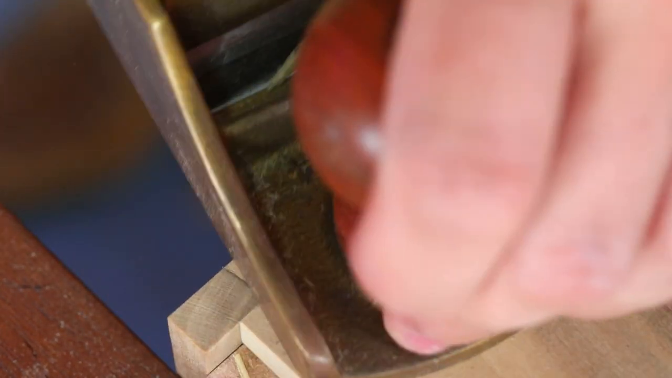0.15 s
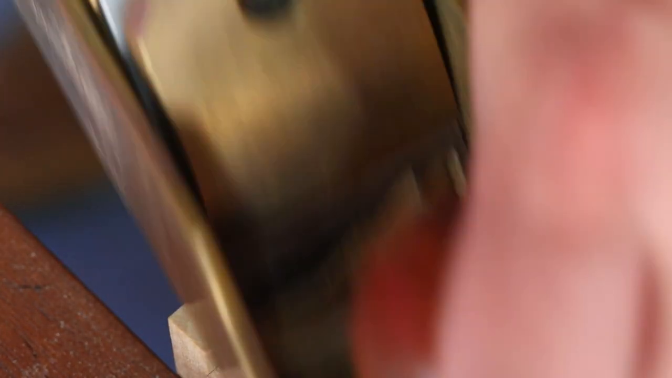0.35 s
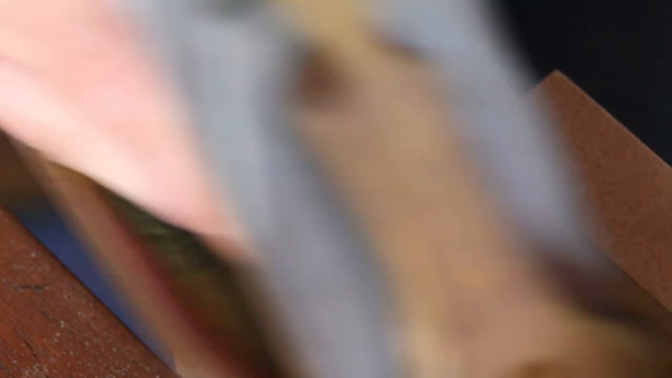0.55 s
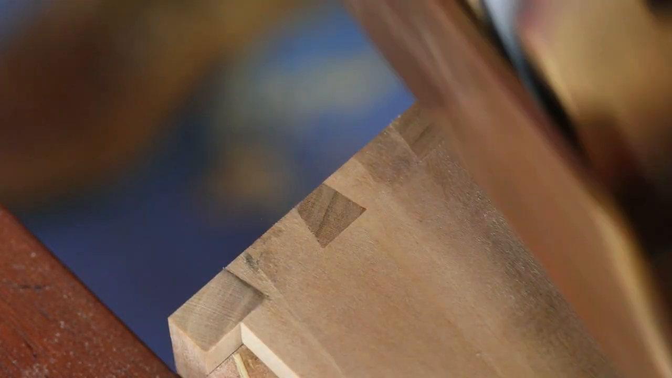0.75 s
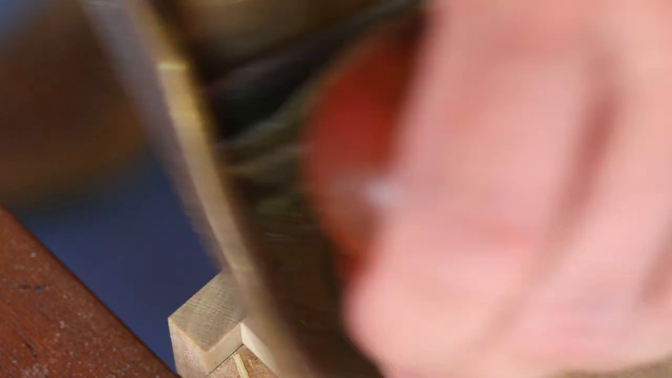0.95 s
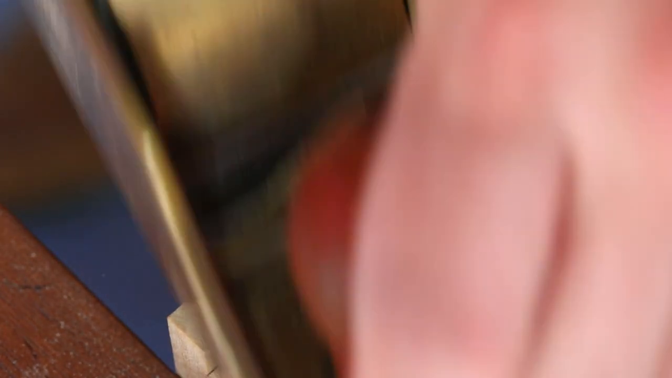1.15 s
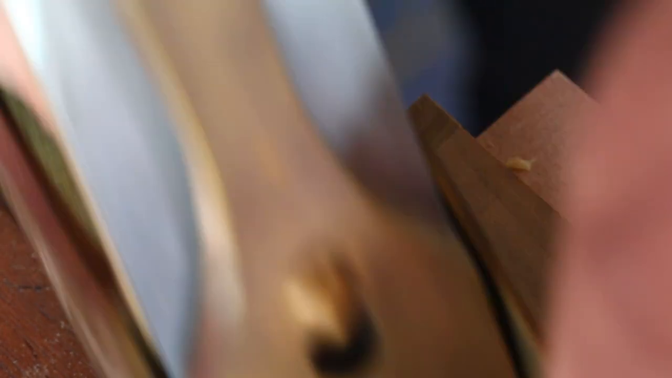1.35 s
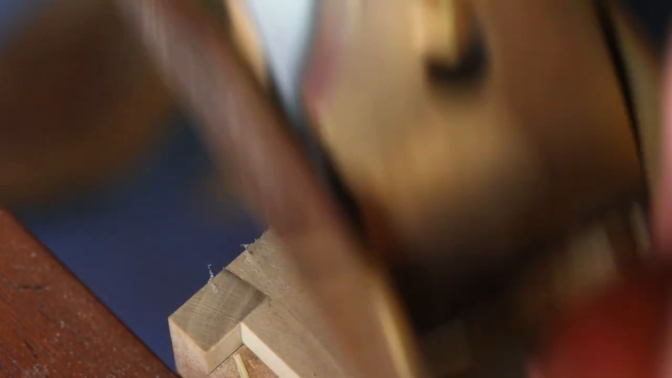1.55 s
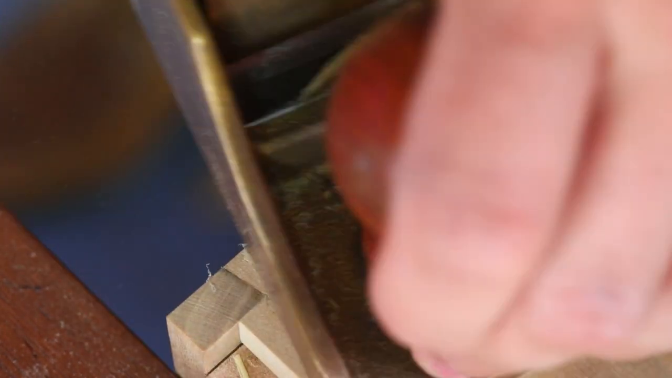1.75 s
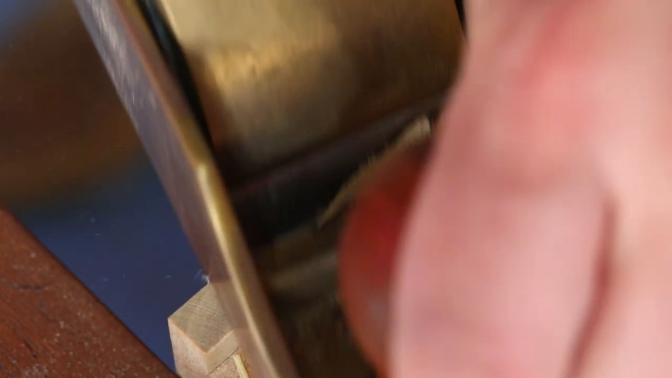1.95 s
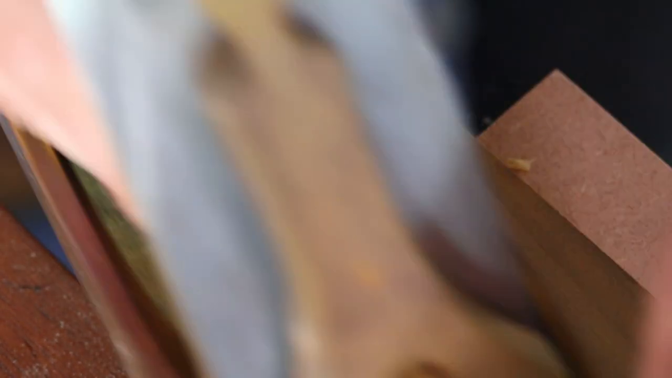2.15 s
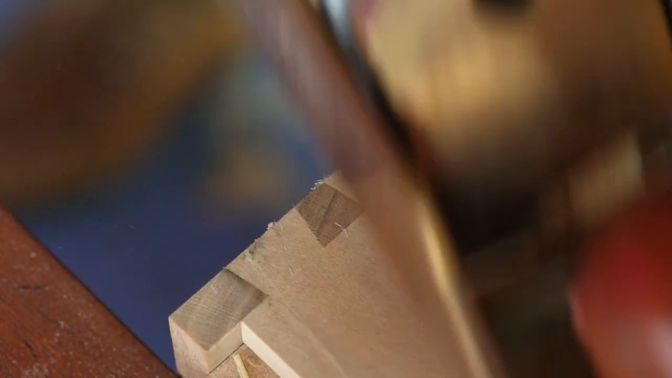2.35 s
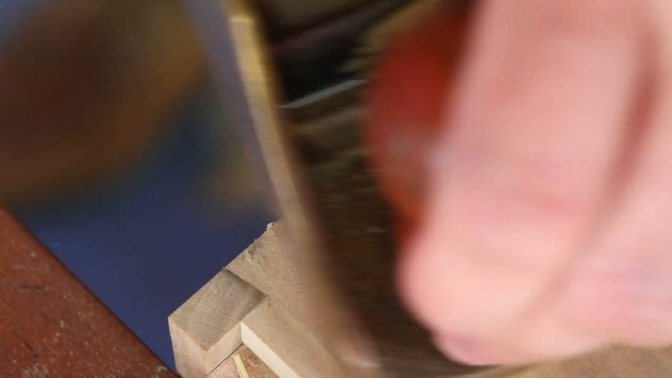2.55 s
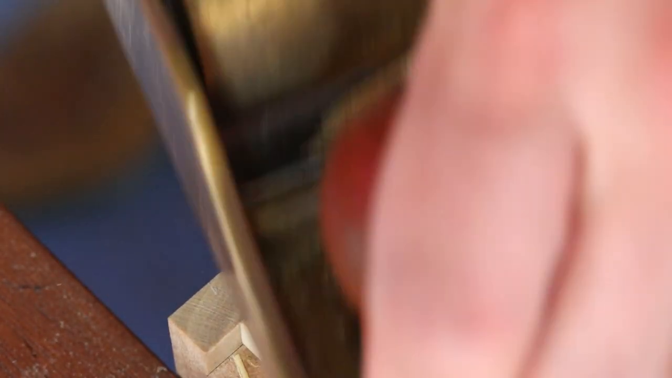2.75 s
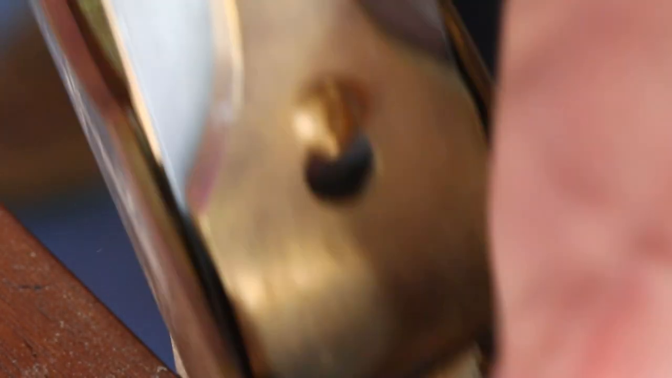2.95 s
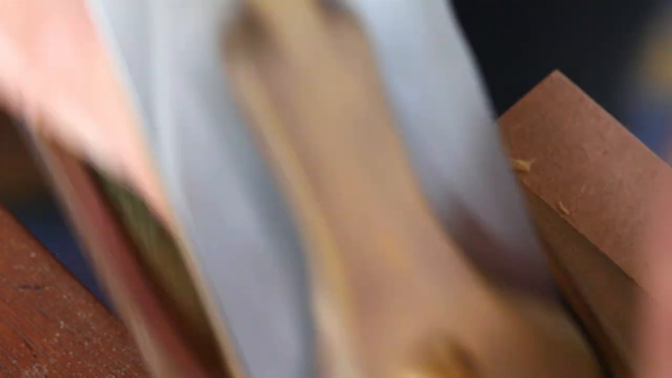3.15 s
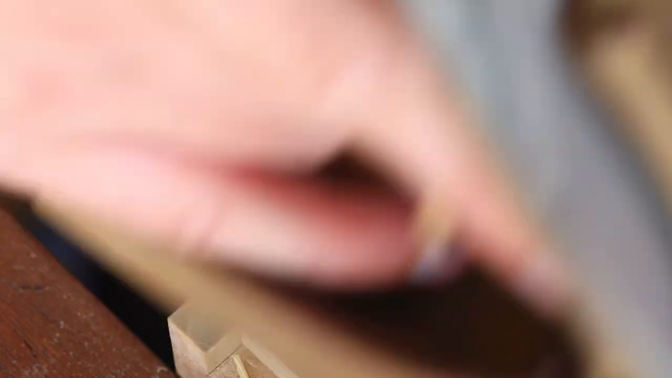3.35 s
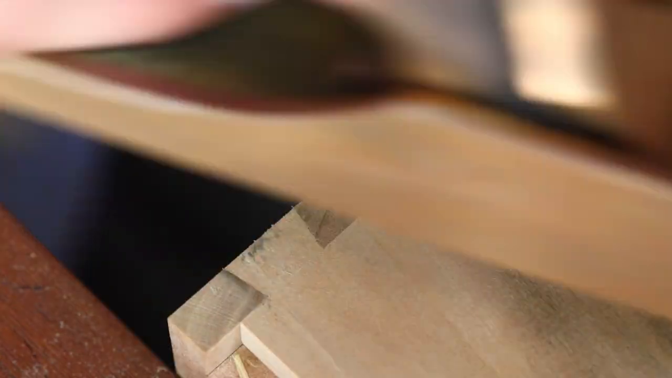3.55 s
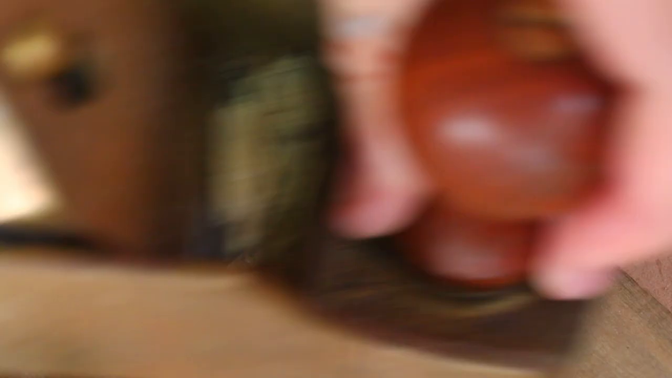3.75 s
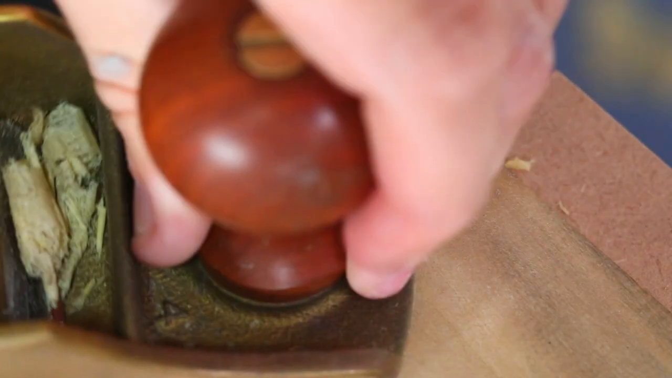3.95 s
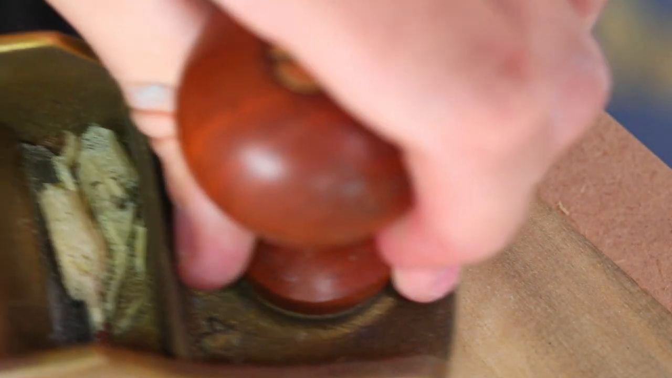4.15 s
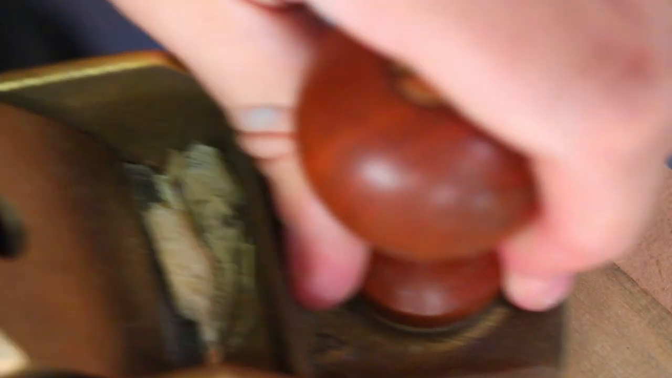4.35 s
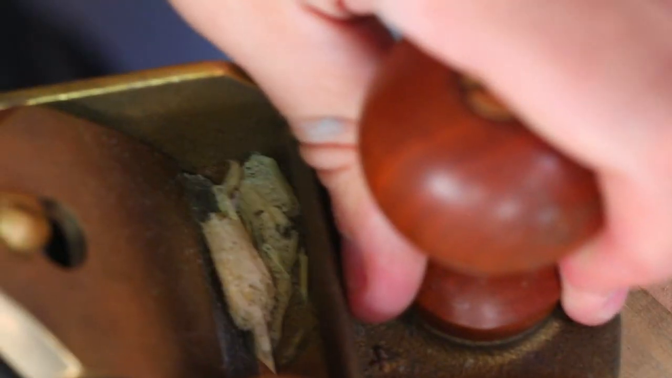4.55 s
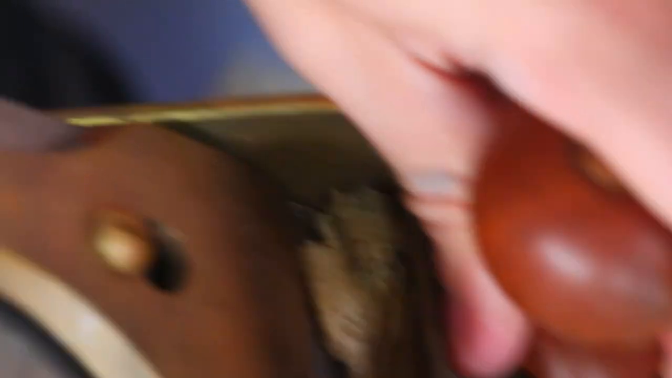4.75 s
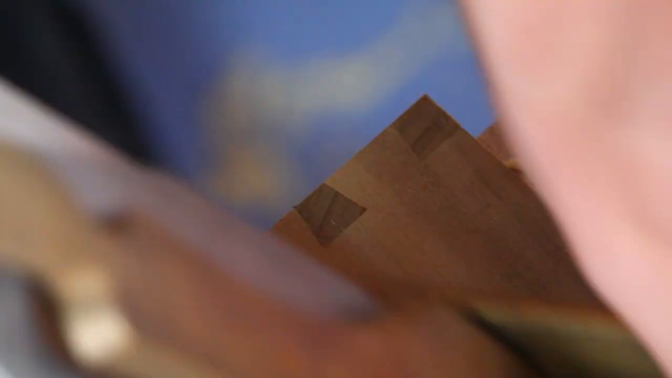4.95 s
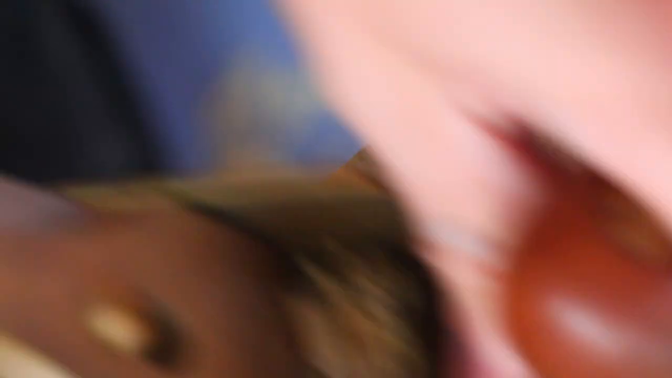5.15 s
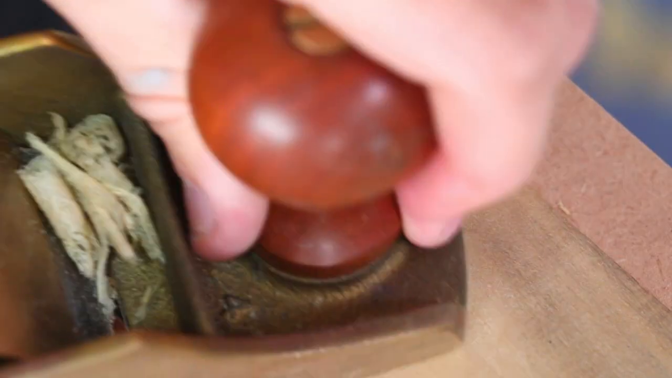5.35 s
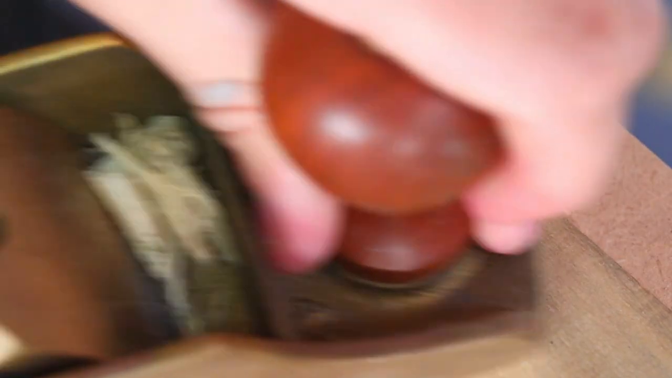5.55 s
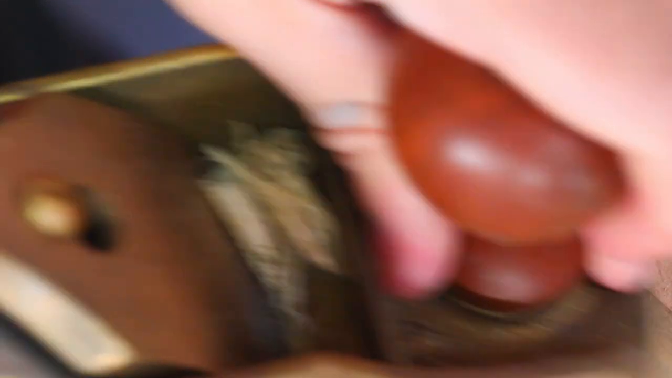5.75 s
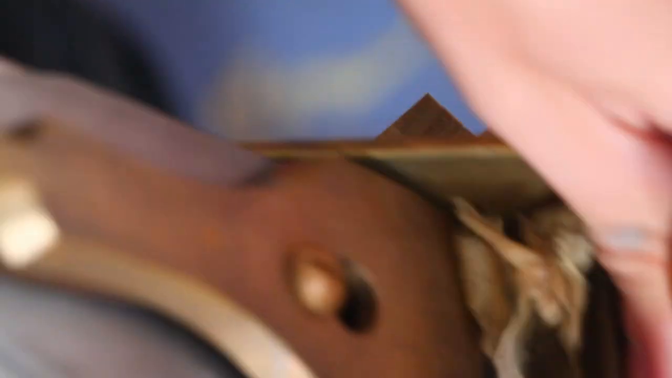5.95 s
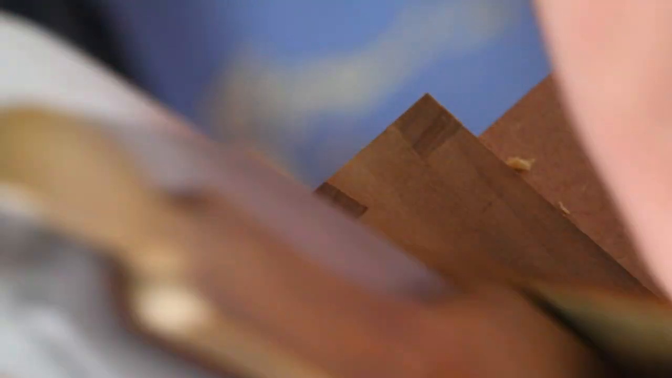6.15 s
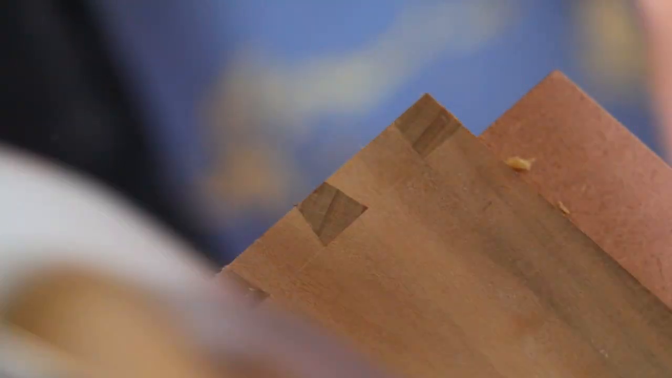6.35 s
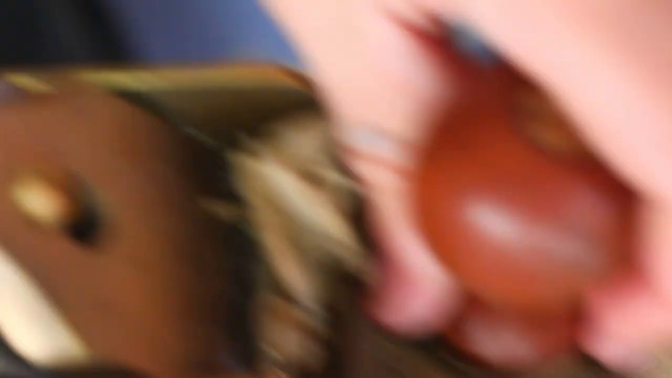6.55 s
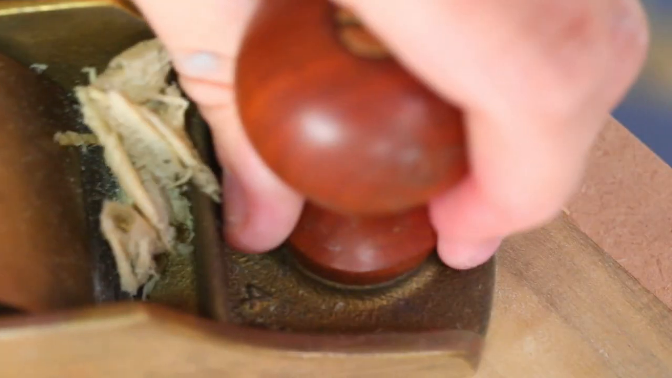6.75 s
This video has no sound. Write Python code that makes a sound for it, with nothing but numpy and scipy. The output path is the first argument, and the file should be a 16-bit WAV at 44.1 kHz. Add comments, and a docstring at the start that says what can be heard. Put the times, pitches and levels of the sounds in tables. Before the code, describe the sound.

Close to a workbench, a heavy metal plane lands on a wooden box with hard, hollow knocks, the second by far the loudest. Each knock leads to short gritty scrapes with a strong first bite, tearing fibres and thin hiss. After a softer, quieter pause the plane is repositioned, and smaller knocks and rougher, squeakier rasps follow. A small room answers briefly over very faint low air noise.

```python
"""Hand plane on end grain

Small workshop, one microphone close to the bench: a bronze plane trims the end grain of a dovetailed box.
Each landing of the sole is a knock: damped modes of box, plane and bench, a joint rattle and a dry click.
Each push is shaped noise: a rasp in the sole, tearing fibres and the iron's hiss; short tones squeak.
The bench trembles under the weight, the room answers knocks and scrapes, and low room noise lies behind.
"""
import sys
import numpy as np
from scipy import signal
from scipy.fft import rfft, irfft, next_fast_len
from scipy.io import wavfile
from scipy.ndimage import uniform_filter1d, map_coordinates

SR = 44100
rng = np.random.default_rng(int(sys.argv[2]) if len(sys.argv) > 2 else 0)


def wrap_up_sound(samples):
    """Save the sound to the file named by the first command line argument, as 16-bit audio."""
    columns = np.atleast_2d(samples).T
    # keep every value between -1 and 1, then stretch to whole-number steps
    tamed = np.clip(columns, -1, 1)
    steps = np.round(tamed * 32767).astype(np.int16)
    wavfile.write(sys.argv[1], SR, steps)


N = 304113  # length in samples

# The sole lands on the box, or the iron butts against its edge: t/s, level/dB (peak of box and plane),
# bench thud/dB and plane's ring/dB (both relative), upper edge f/Hz, damping by the hands (1 = normal)
LANDINGS = [(0.1991, -12, -0.5, -0.5, 2280, 1.3), (1.0674, -3.5, -7, 3.5, 3060, 0.94),
            (1.280, -40, 8.5, -4, 900, 1.0), (1.514, -53.5, -7.5, -7, 604, 1.0),
            (1.8194, -12.5, -0.5, 4.5, 2330, 1.5), (1.974, -39, 7, -9, 900, 0.57),
            (2.2840, -37.5, -3.5, -0.5, 1410, 0.74), (2.6141, -19.5, -4.5, 3.5, 2167, 1.83),
            (2.840, -31, -4.5, 6.5, 1300, 1.2), (3.238, -34.5, -5, -11.5, 2000, 1.26),
            (3.7660, -35.5, -1.5, -13.5, 990, 1.1), (3.9521, -20, -4.5, -7.5, 1690, 1.08),
            (5.3825, -17.5, -8, -0.5, 1880, 1.38), (5.4950, -39, 4.5, 0, 917, 0.78),
            (6.2450, -43, 12, -6, 901, 0.86), (6.7482, -23, -3, -13, 1180, 1.25)]
# Wooden box: f/Hz, level/dB, t60/s at damping 1
BOX_MODES = [(322.5, -17, .06), (439, -3, 0.082), (505.5, -2, 0.087), (571, -3.5, 0.064), (701, -7, .05),
             (812, -6, 0.046), (940, -9, 0.014)]
# Bronze body of the plane: f/Hz, level/dB, t60/s at damping 1
PLANE_MODES = [(1181.5, 3.5, .055), (1299.5, -4, 0.071), (1750, -11, 0.052), (1957, -3.5, 0.025),
               (2052, -2.5, 0.039), (2230, -4.5, 0.018), (2850, -26, 0.09), (3602, -25, 0.085),
               (4104, -21, 0.081), (5460, -13, 0.078)]
# Many weak modes between the strong ones: f/Hz, level/dB per Hz (relative)
WEAK_MODES = [(200, -10.5), (900, 2.5), (1550, 4), (2100, 0.5), (2600, -4.5), (3300, -8.5), (4200, -9),
              (5600, -7), (9000, -17.5)]
# Bench under the box, once the thud has settled: f/Hz, level/dB, t60/s at damping 1
BENCH_MODES = [(80, -42.5, 0.23), (109, -25.5, .25), (144.4, -17.5, .22), (175.8, -16.5, 0.22),
               (205.5, -19.5, 0.085), (240.4, -14.5, 0.16), (270.5, -18, 0.14), (445, -19, 0.17),
               (565, -27.5, 0.29)]
# Rattle of box and vice: f/Hz, level/dB per Hz (relative)
JOINT_RATTLE = [(60, -22.5), (130, 3), (220, 3.5), (330, -5.5), (500, -12.5), (900, -11), (1600, -17.5),
                (3000, -34), (9000, -54.5)]
KNOCK_ROOM_DB = 7  # the room's answer to a landing


def knocks(rattle_db=-10, rattle_t60=0.27, stiffening=.2, settle_s=.025, directions=4):
    """Each landing excites damped modes of box and plane, and longer ones in the bench."""
    track = np.zeros(N)
    t = np.arange(SR * 3 // 4) / SR
    # the blow presses the joints tight, so the thud starts high and sinks
    sinking = t + stiffening * settle_s * (1 - np.exp(-t / settle_s))
    for s, db, thud_db, plane_db, edge_hz, damping in LANDINGS:
        weak = amp(-4) * coloured(rng.standard_normal(len(t)), WEAK_MODES)
        weak = weak * amp(-60 * t * damping / .035)
        plane = ring(PLANE_MODES, t, damping, scatter_db=1.5) + weak
        body = ring(BOX_MODES, t, damping, scatter_db=2.4) + amp(plane_db) * plane
        body = softened(body, edge_hz)
        body = body / np.abs(body).max()

        rattle = coloured(rng.standard_normal(len(t)), JOINT_RATTLE)
        rattle = amp(rattle_db) * rattle * amp(-60 * t / rattle_t60)
        bench = ring(BENCH_MODES, sinking, damping=0.97, scatter_db=1.0)
        thud = amp(thud_db) * (bench + rattle) * (1 - np.exp(-t / 0.004))
        shove = amp(-29) * np.sin(2 * np.pi * 45 * t) * amp(-60 * t / 0.042)
        click = contact(t, edge_hz)

        # the click leaves differently in each direction, so its echo is smooth
        sprays = [workshop(contact(t[:SR // 2], edge_hz)) for _ in range(directions)]
        spray = sum(sprays) / np.sqrt(directions)
        echo = amp(KNOCK_ROOM_DB) * workshop(softened(body, edge_hz=3100) + amp(-13) * thud)

        add(track, s, amp(db) * (body + thud + shove + click + echo))
        add(track, s, amp(db + KNOCK_ROOM_DB + 2) * spray)
        # one edge of the sole touches just before the rest
        add(track, s - .0012, amp(db - 14) * click)
    return track


def ring(modes, t, damping, scatter_db):
    """Damped modes at new strengths for each blow; neighbours swing in opposite directions."""
    total = 0
    for k, (hz, db, t60) in enumerate(modes):
        strength_db = db + scatter_db * rng.standard_normal()
        decay = amp(strength_db - 60 * t * damping / t60)
        total = total + (-1) ** k * decay * np.sin(2 * np.pi * hz * t)
    return total


# Colour of the contact click: f/Hz, level/dB per Hz (relative)
CLICK_COLOUR = [(100, -8), (1000, 2.5), (2000, 1), (2600, 3), (3200, -2.5), (4100, -3.5), (5600, -6),
                (8000, -7.5), (15000, -5)]
CLICK_DB = -16  # relative to the knock, before decay and softening


def contact(t, edge_hz):
    """The short dry click of bronze on wood: noise decaying within milliseconds."""
    burst = coloured(rng.standard_normal(len(t)), CLICK_COLOUR) * amp(-60 * t / .024)
    return amp(CLICK_DB) * softened(burst, 2.8 * edge_hz)


def softened(x, edge_hz):
    """A longer contact passes less treble: a second-order low-pass."""
    low_pass = signal.butter(2, min(edge_hz, SR / 3), fs=SR, output="sos")
    return signal.sosfilt(low_pass, x)


# The sole skims with no weight on it: t/s, level/dB (hiss at mid-skim, before the mix), length/s
SKIM_PASSES = [(1.595, -72.5, 0.12), (2.607, -65.5, 0.124), (3.72, -70, .12), (4.272, -71.5, .24),
               (5.37, -65, 0.086), (6.29, -67.5, 0.38)]
# Rubbed resonances of sole and wood, one list per side of the box, before the glide:
# f/Hz, width/Hz, level/dB (relative)
SOLE_MODES = [
    [(624, 58, -11), (790, 130, -10.5), (1290, 165, -2.5), (1495, 120, -8), (1750, 200, -10.5)],
    [(783.3, 120, -5.5), (1010, 170, -10.5), (1150, 88, -2), (1277, 104, 0), (1800, 130, -14.5),
     (2085, 41, -20)],
]
# Resonances of the iron, one list per side: f/Hz, width/Hz, level/dB (relative)
IRON_MODES = [
    [(4200, 440, -11), (7430, 150, -5.5), (8410, 160, -6.5), (11180, 430, -0.5), (14300, 200, -11.5)],
    [(3600, 400, -8.5), (7583, 91, -9), (10940, 530, -3.5), (12750, 550, -7.5), (14170, 200, -11.5)],
]
# Torn end grain: f/Hz, level/dB per Hz (relative)
FIBRE_COLOUR = [(150, -12.5), (400, -3), (1500, -1.5), (2250, -3), (2800, -1.5), (3600, -3.5), (4200, -1.5),
                (5000, -6.5), (5900, -7), (6700, -12), (15000, -31.5)]
# Fine snaps at the cutting edge: f/Hz, level/dB per Hz (relative)
HISS_COLOUR = [(2000, -34), (5500, -12.5), (7000, -6), (9500, 0.5), (11500, 0.5), (13500, 1), (15800, -2.5)]


def strokes(droop=.03):
    """Friction rasps in the sole, end grain tears, and the thin iron hisses at its own resonances."""
    rasp, tear, edge = efforts()
    for s, db, length in SKIM_PASSES:
        swell = np.sqrt(np.abs(np.hanning(int(length * SR))))
        add(edge, s, amp(db) * swell)
    # the rasp sinks a little as the contact moves along the sole
    sole = rubbed(scrape(grain_db=2.0, grain_rate=250), SOLE_MODES)
    sole = glide(sole, 1 - droop * travel())
    fibres = coloured(scrape(grain_db=1.0, grain_rate=400), FIBRE_COLOUR)
    fibres = patchy(fibres, depth_db=2.0)
    snaps = coloured(scrape(grain_db=2.0, grain_rate=1500), HISS_COLOUR)
    iron = rubbed(scrape(grain_db=2.0, grain_rate=540), IRON_MODES)
    hiss = patchy(snaps + amp(-3) * iron, depth_db=2.1)
    return amp(-1.5) * rasp * sole + amp(1.5) * tear * fibres + edge * hiss


# The plane is pushed: t/s, length/s, attack/s, level/dB (hiss, before the mix), change by the end/dB,
# first bite/dB, sole's rasp/dB and torn fibres/dB (both relative to the hiss)
PUSH_STROKES = [(0.375, 0.19, .012, -49.5, -3, 7.5, 4, -4.5), (1.255, .15, .024, -46.5, -4, 5.5, 1, -4.5),
                (1.951, 0.053, .010, -45.5, -0.5, -0.5, 7, -11.5),
                (2.036, 0.17, .05, -46.5, -6.5, -4, 0, -5.5), (2.831, .12, .012, -49, -2, 3.5, 2.5, -7.5),
                (2.985, 0.22, .035, -53, -9.5, -2, -0.5, -1), (3.223, 0.069, .04, -54.5, -3, 2, 2.5, 0),
                (4.48, 0.04, .035, -56, 0, 1.5, 6.5, -7), (4.603, .19, .045, -60, -1, -2, 10.5, -5.5),
                (4.779, .205, .04, -53.5, 2, -1, 5, -6), (5.677, 0.044, .035, -45.5, 0, 0, 3.5, -11.5),
                (5.791, 0.096, .035, -53.5, -2.5, 1, 5.5, -6.5), (5.888, 0.4, .012, -51, -8, 5, 9.5, -3.5)]
# The sole is dragged back over the wood: t/s, length/s, rasp level/dB, fibres level/dB (before the mix)
DRAG_BACK = (5, 0.3, -63.5, -70.5)
BITE_S = 0.064  # the iron digs in hardest as it enters the wood
BITE_IN_RASP, BITE_IN_TEAR = 0.88, .3  # shares of that bite heard in sole and fibres
RASP_FOLLOWS = 0.71  # the sole's rasp changes less along a push than the cut does
TEAR_GROWS_DB = 5  # fibres break out more toward the far edge
RASP_RELEASE_S, TEAR_RELEASE_S, EDGE_RELEASE_S = 0.04, 0.034, .024  # time constants as a push ends
APPROACH_DB, APPROACH_S = -15.5, 0.042  # the sole slides up to the edge: hiss on both sides of the start
UNSTEADY_DB, UNSTEADY_RATE = 1.13, 22  # the grain resists unevenly: dB, random knots a second


def efforts():
    """Gains of rasp, tearing and hiss: each push slides in, bites, drifts in force and lets go."""
    s, length, rasp_db, tear_db = DRAG_BACK
    drag = gate(s, length, attack=0.05, release=.08)
    rasp, tear, edge = amp(rasp_db) * drag, amp(tear_db) * drag, np.zeros(N)
    for s, length, attack, db, change_db, bite_db, rasp_db, tear_db in PUSH_STROKES:
        t = np.arange(N) / SR - s
        progress = np.clip(t / length, 0, 1)
        bite = bite_db * np.exp(-(t / BITE_S) ** 2)
        drift = change_db * progress
        approach = amp(APPROACH_DB) * np.exp(-np.abs(t) / APPROACH_S)
        rasp_gain = amp(db + rasp_db + RASP_FOLLOWS * drift + BITE_IN_RASP * bite)
        tear_gain = amp(db + tear_db + drift + TEAR_GROWS_DB * progress + BITE_IN_TEAR * bite)
        rasp += rasp_gain * gate(s, length, attack, RASP_RELEASE_S)
        tear += tear_gain * gate(s, length, attack, TEAR_RELEASE_S)
        edge += amp(db) * (approach + amp(drift + bite) * gate(s, length, attack, EDGE_RELEASE_S))
    return np.array([rasp, tear, edge]) * amp(UNSTEADY_DB * wobble(UNSTEADY_RATE))


RETURN_S = .25  # time constant of the position, forward and back


def travel():
    """Where the plane is: it moves from -1 toward 1 while pushed and is drawn back in the pauses."""
    pushing = sum(gate(s, length, attack, EDGE_RELEASE_S) for s, length, attack, *_ in PUSH_STROKES)
    step = 1 / (RETURN_S * SR)
    return 2 * signal.lfilter([step], [1, step - 1], pushing) - 1


def scrape(grain_db, grain_rate):
    """Countless tiny fibre snaps in clumps: noise whose level wanders quickly and slowly."""
    level_db = grain_db * wobble(grain_rate) + 1.5 * wobble(45)
    return unit(rng.standard_normal(N) * amp(level_db))


TURN_S = 3.6  # the plane is turned to the next side of the box; the glide brings the sole's turn sooner


def rubbed(x, sides):
    """Friction noise through the resonances of whichever side is being planed."""
    first, second = (unit(resonant(x, modes)) for modes in sides)
    return np.where(np.arange(N) / SR < TURN_S, first, second)


def glide(x, pitch):
    """x read at a changing speed, which shifts its resonances."""
    return map_coordinates(x, [np.cumsum(pitch)], mode="mirror")


def patchy(x, depth_db=2.0):
    """The colour of the scrape wanders at random as the iron crosses the growth rings."""
    z = signal.stft(x, nperseg=512)[2]
    field = uniform_filter1d(rng.standard_normal(z.shape), size=7, axis=0)  # smooth over frequency
    field = uniform_filter1d(field, size=9, axis=1)  # smooth over time
    return unit(signal.istft(z * amp(depth_db * unit(field)), nperseg=512)[1][:N])


# The sole judders or squeaks as it settles, catches or slides off:
# t/s, level/dB (nominal, direct sound), length/s before release, mean slip rate f/Hz
SQUEAKS = [(0.2076, -20, 0.0043, 1204), (0.422, -37.5, 0.0089, 1312), (1.072, -15.5, 0.0067, 1198),
           (1.273, -26.5, 0.0071, 1278), (1.516, -53, 0.016, 439), (1.828, -29, 0.0039, 1193),
           (2.196, -43.5, 0.013, 1240), (2.84, -37, 0.022, 1294), (2.841, -40, 0.015, 768),
           (3.264, -45.5, 0.016, 2700), (4.921, -43.5, 0.012, 1260), (5.894, -32.5, 0.032, 1290),
           (5.962, -39.5, 0.021, 1264)]


def judders(jitter=0.076):
    """A run of sticks and slips, heard as a short tone of unsteady pitch."""
    track = np.zeros(N)
    t = np.arange(SR // 8) / SR
    for s, db, length, slip_hz in SQUEAKS:
        drift = unit(uniform_filter1d(rng.standard_normal(len(t)), size=60))
        swell = (1 - np.exp(-t / 0.0041)) * np.exp(-np.maximum(t - length, 0) / 0.0044)
        cycles = np.cumsum(slip_hz * (1 + jitter * drift)) / SR
        add(track, s, amp(db) * np.sqrt(2) * swell * np.sin(2 * np.pi * cycles))
    return track


# Weight bears on the bench: t/s, length/s, frame's drone level/dB, top's rumble level/dB
BENCH_LEANS = [(4.487, 0.48, -65, -56), (5.0, 0.3, -65, -67), (5.35, .93, -56.5, -60),
               (6.297, 0.66, -64.5, -69.5)]
# Sway of the bench frame: f/Hz, width/Hz, level/dB (relative)
FRAME_MODES = [(78, 7.5, -2), (108, 13, -10.5)]
# Rumble of the bench top: f/Hz, level/dB per Hz (relative)
TOP_RUMBLE = [(60, -22), (120, -11.5), (160, -3), (210, -0.5), (330, -12), (600, -10.5), (1500, -41)]
LEAN_ATTACK_S, LEAN_RELEASE_S = 0.17, 0.16


def rumble():
    """The bench trembles under the weight: noise in the frame's resonances and a low rumble of the top."""
    drone = unit(resonant(rng.standard_normal(N), FRAME_MODES))
    top = coloured(rng.standard_normal(N), TOP_RUMBLE)
    track = np.zeros(N)
    for s, length, drone_db, top_db in BENCH_LEANS:
        weight = gate(s, length, LEAN_ATTACK_S, LEAN_RELEASE_S)
        track += weight * (amp(drone_db) * drone + amp(top_db) * top)
    return track


def near_surfaces(x, echo_db=-14, count=6, sweep_s=0.00011):
    """Box, hands and bench top throw back weak copies whose delays shift as the plane moves."""
    n = np.arange(N)
    moved = sweep_s * travel()
    paths = rng.uniform([.0006, -1], [.009, 1], (count, 2))  # delay in s, share of the shift
    copies = sum(map_coordinates(x, [n - (delay + lean * moved) * SR]) for delay, lean in paths)
    return x + amp(echo_db) * copies


# Decay of the workshop: f/Hz, t60/s
ROOM_DECAY = [(80, 0.81), (210, 0.91), (560, .4), (1400, 0.65), (4000, 0.74), (10000, 0.34)]
# Colour of its answer: f/Hz, level/dB
ROOM_COLOUR = [(40, -10.5), (150, 9), (400, -2), (900, 1.5), (1200, -7.5), (1600, -1.5), (2100, -6),
               (3800, 1.5), (5500, -1), (14000, -3.5)]


def workshop(x, build=0.0044, early_db=2, early_life=0.012):
    """The room's answer: strong near reflections, then a noise tail that lasts longest in the bass."""
    hz, t, z = signal.stft(rng.standard_normal(SR * 3 // 4), SR, nperseg=256)
    decay_db = -60 * t / along(ROOM_DECAY, hz)[:, None]
    colour_db = along(ROOM_COLOUR, hz)[:, None]
    tail = signal.istft(z * amp(decay_db + colour_db), SR, nperseg=256)[1]
    t = np.arange(len(tail)) / SR
    onset = 1 - np.exp(-(t / build) ** 2)
    early = 1 + amp(early_db) * np.exp(-t / early_life)
    return signal.fftconvolve(x, tail * onset * early / np.sqrt(SR))[:len(x)]


def moving_room(x, size=16384):
    """The room's answer keeps changing: each short overlapping stretch has its own random tail."""
    track, padded = np.zeros(N + size), np.pad(x, size)
    for start in range(size // 2, N + size, size // 2):
        stretch = padded[start:start + size] * np.hanning(size)
        add(track, start / SR, workshop(np.pad(stretch, (0, size))))
    return track[size:]


# Quiet air of the room: f/Hz, level/dB per Hz (relative)
AIR_COLOUR = [(12, -56), (20, -21), (59, -7), (92, 1.5), (161, -11.5), (259, -9.5), (372, -10), (505, -17),
              (667, -15.5), (725, -11), (1980, -24.5), (2470, -24.5), (3850, -31), (6540, -31),
              (15500, -33)]


def background(db=-60):
    """Steady low room noise and faint hiss: coloured noise."""
    return amp(db) * coloured(rng.standard_normal(N), AIR_COLOUR)


def amp(db):
    """Decibels to gain."""
    return 10 ** (np.asarray(db) / 20)


def unit(x):
    """Scale to rms 1."""
    return x / np.sqrt(np.mean(x ** 2) + 1e-20)


def along(points, hz):
    """(Hz, value) points read on a log axis."""
    f, v = np.transpose(points)
    return np.interp(np.log(hz + 1), np.log(f + 1), v)


def filtered(x, response):
    """x times a complex response of frequency."""
    m = next_fast_len(x.shape[-1] + SR // 4)
    spectrum = rfft(x, m) * response(np.fft.rfftfreq(m, 1 / SR))
    return irfft(spectrum, m)[..., :x.shape[-1]]


def coloured(x, spectrum):
    """x shaped by a spectrum, at rms 1."""
    return unit(filtered(x, lambda hz: amp(along(spectrum, hz))))


def resonant(x, modes):
    """x played through (Hz, width, dB) resonances whose signs alternate."""
    def response(f):
        total = 0
        for k, (centre, width, db) in enumerate(modes):
            loss = 1j * f * width
            total = total + (-1) ** k * amp(db) * loss / (centre * centre - f * f + loss)
        return total
    return filtered(x, response)


def wobble(rate):
    """A smooth random curve, rate knots a second."""
    knots = rng.standard_normal(int(N * rate / SR) + 4)
    return map_coordinates(knots, [np.arange(N) * rate / SR])


def gate(start, length, attack, release):
    """Smooth attack, hold, exponential release."""
    t = np.arange(N) / SR - start
    rise = np.sin(np.pi / 2 * np.clip(t / attack, 0, 1)) ** 2
    return rise * np.exp(-np.maximum(t - length, 0) / release)


def add(track, s, x):
    """Mix x into the track from time s."""
    part = track[round(s * SR):][:len(x)]
    part += x[:len(part)]


def scene():
    """One close microphone feeds both channels, each with a trace of its own hiss."""
    cutting, slips = strokes(), judders()
    direct = amp(0.5) * near_surfaces(cutting) + slips
    planing = direct + amp(3) * moving_room(cutting + slips)
    mono = knocks() + planing + rumble() + background()
    return mono + amp(-72.5) * rng.standard_normal((2, N))


TOP_HZ = 15830  # band limit


def record(dry):
    """Nothing is kept above the band limit."""
    return filtered(dry, lambda hz: hz < TOP_HZ)


dry = scene()
out = record(dry)
wrap_up_sound(out)
```